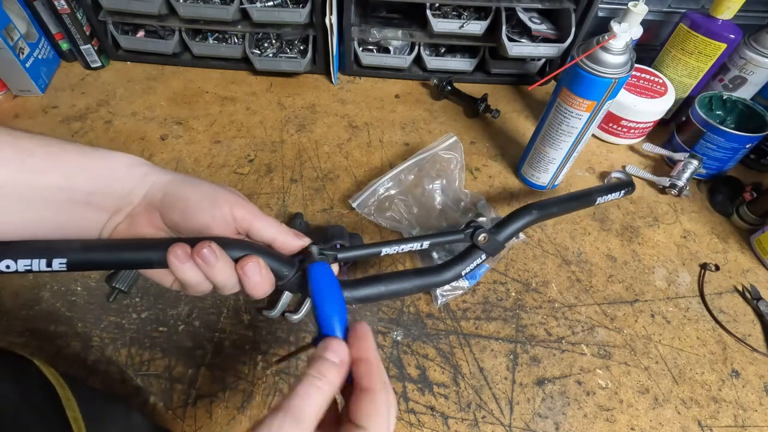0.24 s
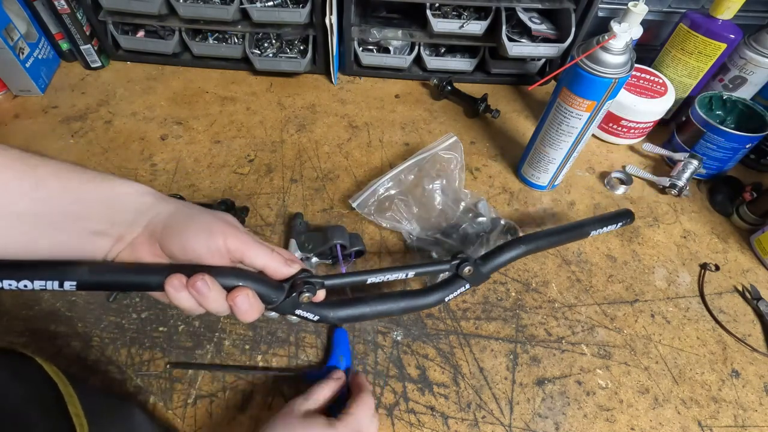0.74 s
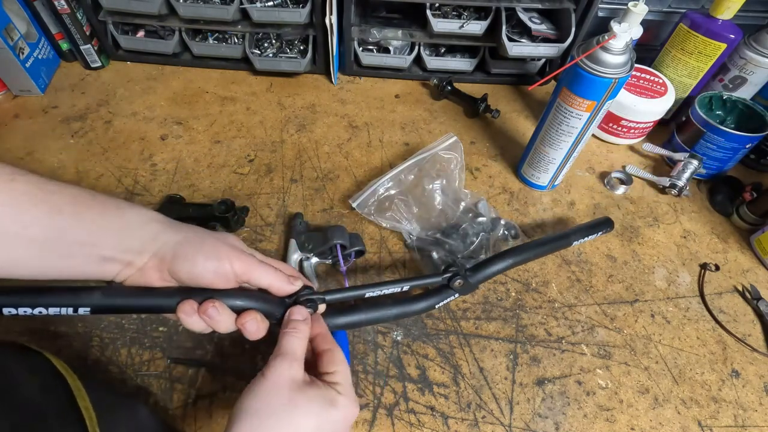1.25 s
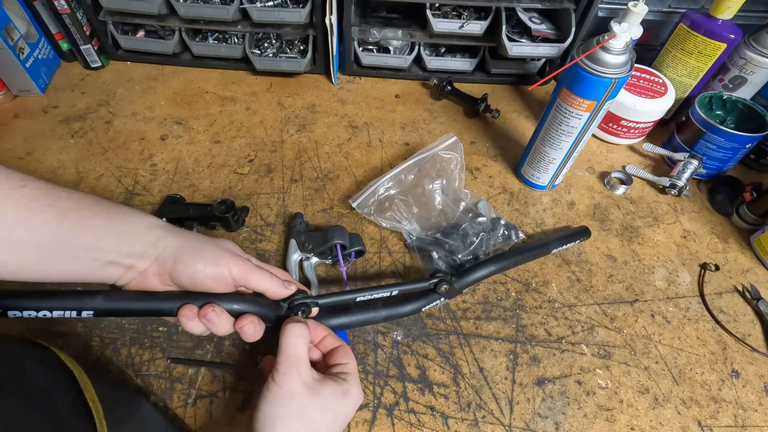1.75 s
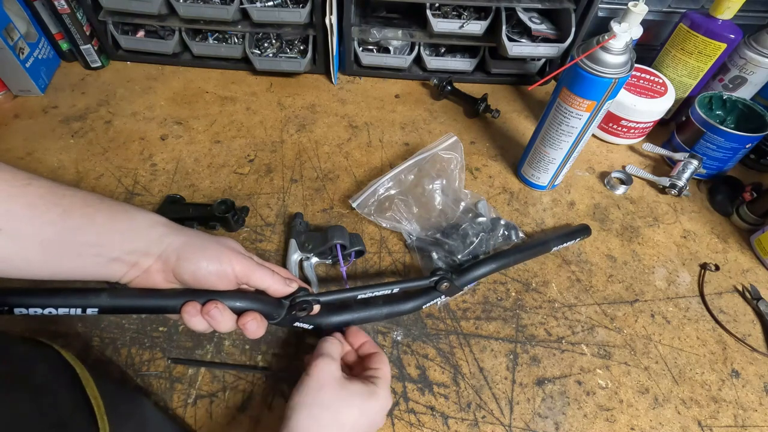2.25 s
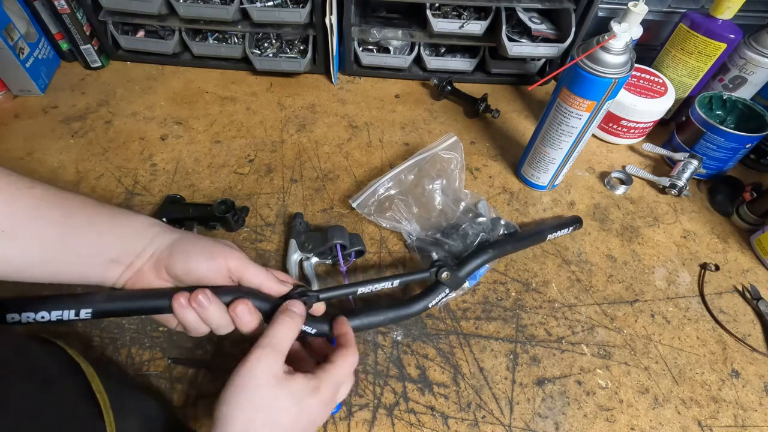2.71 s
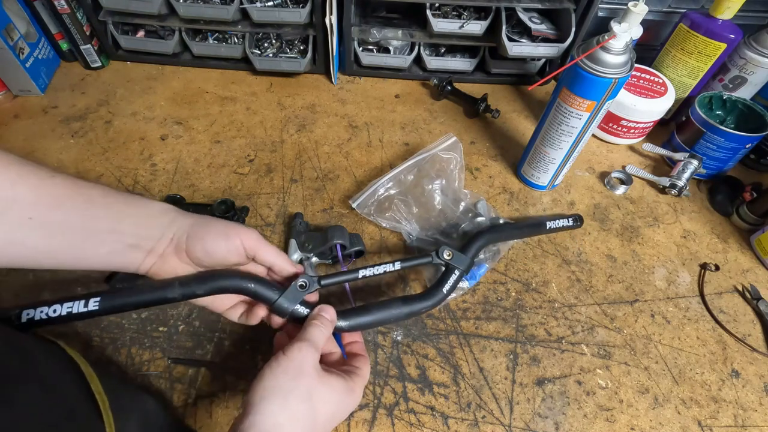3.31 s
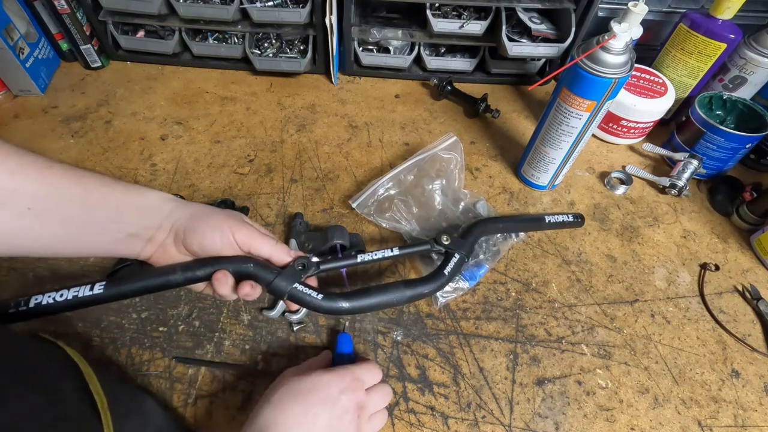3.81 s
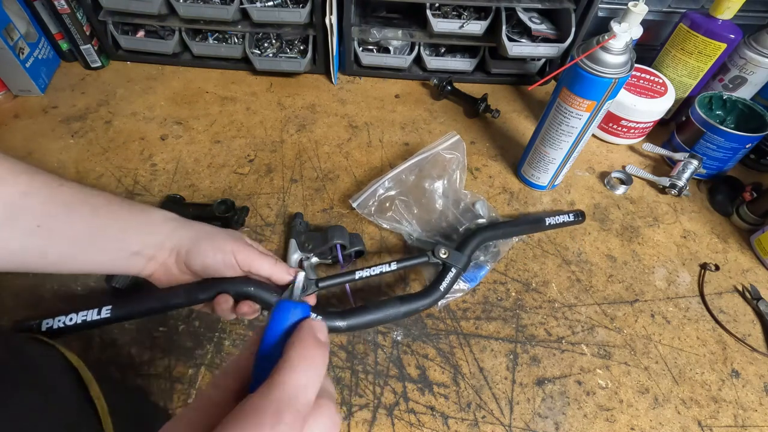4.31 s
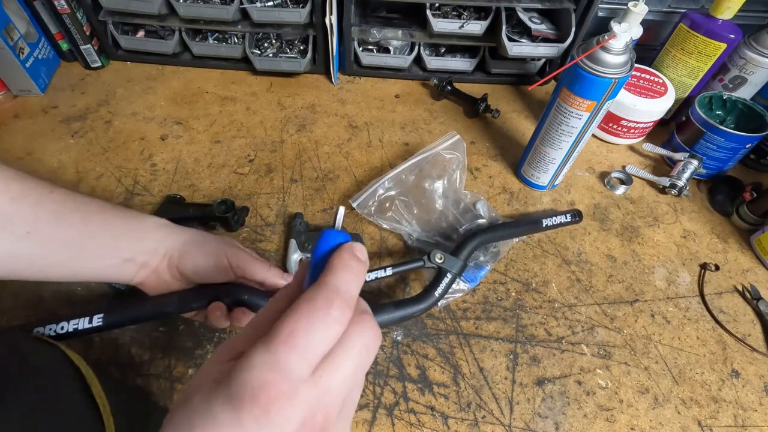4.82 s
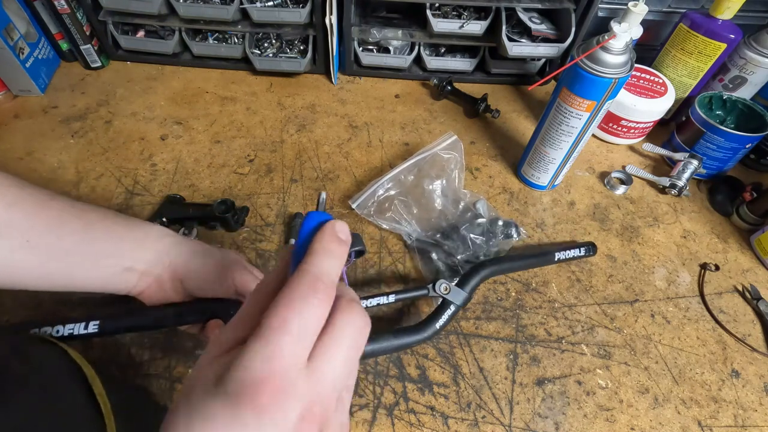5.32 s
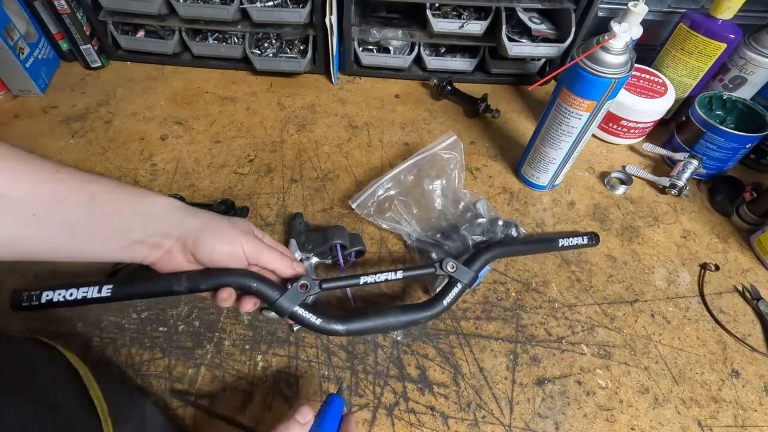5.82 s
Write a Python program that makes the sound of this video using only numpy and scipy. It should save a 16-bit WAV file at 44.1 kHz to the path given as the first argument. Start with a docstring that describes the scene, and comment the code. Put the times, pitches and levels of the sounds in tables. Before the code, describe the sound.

A hex key works on handlebar clamp hardware. First loud short clicks with a low thump, then tool-on-wood clatter, quiet fumbling, metal ticks and one bright crack. A quieter middle holds faint bolt ticks and skin and cloth sliding. Small bar taps build to a loud clank with a bench knock, then soft rustling. Recorded close, with low rumble and a short room echo.

```python
"""Hands work a hex key on the clamp of a metal handlebar above a wooden workbench in a workshop.
Metal ticks are noise cracks that ring the clamp or bar as damped sines; knocks excite the dense modes of the bench.
Random micro-slips scrape metal on metal, and fingers spin a loose bolt that ticks faintly.
Soft bumps and nudges wake single tones; skin, cloth and palm slide as shaped noise.
The bench carries a low rumble and hum to the microphone, and dying noise gives the room its echo."""
import sys
import numpy as np
from scipy import signal
from scipy.io import wavfile

SR = 44100
rng = np.random.default_rng(int(sys.argv[2]) if len(sys.argv) > 2 else 0)


def transcribe(u):
    """Save the signal u as a 16-bit wav file named by the first command-line argument.

    u: samples, shape (n,) or (channels, n), limited to [-1, 1]; the rate is SR.
    q: integer samples, one column per channel.
    """
    v = np.clip(np.atleast_2d(u).T, -1, 1)
    q = np.round(v * 32767).astype(np.int16)
    wavfile.write(sys.argv[1], SR, q)


N = 266893

# ringing modes of the clamp and its bolt: f/Hz, level/dB, free t60/s
CLAMP_MODES = [(1835, -1, .12), (2630, -14, .05), (3585, 3, .08), (4732, 5, .09), (5308, 1, .07),
               (5600, 3, .05), (6330, 6, .05), (7070, -3, .03)]
# ringing modes of the handlebar: f/Hz, level/dB, free t60/s
BAR_MODES = [(1072, -5, .16), (1109, -2, .19), (1674, -13, .25), (1895, -9, .2), (2207, -5, .2),
             (2745, -5, .17), (3311, -7, .16), (3989, -12, .2), (4156, -8, .2), (4525, -8, .2),
             (4678, -12, .16), (5216, -1, .16), (5297, -4, .15), (5636, -15, .2), (6300, -9, .1),
             (7000, -12, .08), (8931, -15, .2)]
# low modes of the bench: f/Hz, level/dB, t60/s when struck hard
BENCH_MODES = [(102.9, 4, 0.32), (162.7, -7.5, 0.35), (250, -4.5, 0.1), (288, -1, 0.067), (407.5, -7, 0.15),
               (620, -22.5, 0.035)]
BAR_FREE_S = 4.4   # from here on the key taps the bar, earlier the bolt
MIRROR = np.array([[1], [-1]])   # puts a side signal into left and right with opposite signs


def amp(db):
    """Turn dB into a linear gain."""
    return 10 ** (np.asarray(db) / 20)


def rms_one(x):
    """Scale a signal to an RMS of 1."""
    return x / np.sqrt(np.mean(x ** 2) + 1e-20)


def at_hz(points, hz):
    """Read a curve of (Hz, value) points along log frequency."""
    curve_hz, values = np.transpose(points)
    return np.interp(np.log(hz), np.log(curve_hz), values)


def butter(x, hz, kind, order=2):
    """Butterworth filter."""
    return signal.sosfilt(signal.butter(order, hz, kind, fs=SR, output="sos"), x)


def bands(white):
    """Half-octave slices of noise with their centres; neighbours come from unrelated draws."""
    edges = 120 * 2 ** np.arange(0, 7.6, .5)
    for k, (low, high) in enumerate(zip(edges, edges[1:])):
        yield np.sqrt(low * high), butter(white[k % 2], [low, high], "band")


def drift(rate_hz):
    """Slow random wander of spread 1: low-passed noise, computed at every 40th sample."""
    r = np.exp(-2 * np.pi * rate_hz * 40 / SR)
    white = rng.standard_normal(N // 40 + 2002)
    slow = signal.lfilter([1], [1, -2 * r, r * r], white)[2000:]   # skip the filter's settling
    return np.interp(np.arange(N) / 40, np.arange(len(slow)), rms_one(slow))


def ring(x, hz, t60):
    """Two-pole resonator: a unit click sets a dying sine of height 1 ringing."""
    r = amp(-60 / (max(t60, .004) * SR))
    w = 2 * np.pi * hz / SR
    return signal.lfilter([0, np.sin(w)], [1, -2 * r * np.cos(w), r * r], x + 1e-18)


def dying_noise(decay, colour, channels):
    """Impulse response of many dense modes: noise that dies at its own pace in each band; energy 1."""
    t = np.arange(SR) / SR
    out = 0
    for hz, band in bands(rng.standard_normal((2, channels, SR))):
        out = out + band * amp(at_hz(colour, hz) - 60 * t / at_hz(decay, hz))
    return rms_one(out) / np.sqrt(SR)


def struck(modes, s, db, favoured_hz, focus_db, waver_db=0):
    """Each contact strikes every mode by chance, most near its pitch (focus: dB per octave); modes can waver."""
    at, out = np.round(s * SR).astype(int), np.zeros(N)
    luck_db = rng.normal(0, 1.6, (len(at), len(modes)))
    for k, (hz, mode_db, t60) in enumerate(modes):
        octaves_off = np.abs(np.log2(hz / favoured_hz))
        clicks = np.zeros(N)
        clicks[at] = amp(db + mode_db + luck_db[:, k] - focus_db * octaves_off)
        out += ring(clicks, hz, t60) * amp(waver_db * drift(66))
    return out


def ticks():
    """A short crack of noise, coloured by modes the contact chokes, then the ring of clamp or bar."""
    # metal contacts: t/s, crack peak level/dB, brightness f/Hz, crack t60/s (limited below),
    # ring level relative to the crack level/dB (low where the grip damps it)
    contacts = [(0.0572, 8, 3350, 0.028, -63), (0.098, 1.5, 2700, 0.028, -45), (0.145, 3, 3800, 0.039, -29),
                (0.17, -4, 5670, 0.035, -43), (0.744, -13, 2700, 0.011, -44),
                (0.832, -13.5, 2220, 0.0092, -36), (0.9029, -10, 2600, 0.057, -27),
                (1.417, -37, 6700, 0.041, -27.5), (1.6544, -33.5, 3600, 0.053, -17),
                (1.72, -19.5, 6640, 0.025, -22), (1.7427, -25, 6140, 0.084, -29),
                (1.7705, -14, 5400, 0.031, -24), (1.976, -29.5, 3590, 0.027, -20.5),
                (2.1238, -9, 4540, 0.027, -22.5), (2.143, -16.5, 3980, 0.03, -23),
                (2.1926, 3.5, 6760, 0.021, -40), (2.428, -21, 5600, 0.037, -47),
                (3.676, -26.5, 3100, 0.017, -43), (3.782, -36, 1700, 0.021, -33),
                (4.5335, -18.5, 4440, 0.04, -41), (4.5586, -18, 3330, 0.16, -14),
                (4.732, -25.5, 3520, 0.011, -44.5), (4.763, -17.5, 3170, 0.059, -6),
                (4.9057, -27, 3300, 0.046, -8.5), (5.024, -29, 2590, 0.11, -6.5),
                (5.086, -26, 2760, 0.22, -3), (5.116, -14, 3200, 0.035, -38),
                (5.1965, 6, 6600, 0.088, -14.5), (5.206, -20, 5400, 0.03, 8), (5.373, -26, 2740, 0.038, -8),
                (5.398, -24, 4430, 0.044, -3), (5.425, -23, 4440, 0.014, -1.5),
                (5.459, -27.5, 6100, 0.048, 0), (5.8565, -39, 2130, 0.052, -3)]
    choked_db, choked_t60 = -39.5, 0.012
    out, t = np.zeros(N + 8192), np.arange(8192) / SR
    luck = rng.standard_normal((len(contacts), len(BAR_MODES)))
    whites = rng.standard_normal((len(contacts), 8192))
    for (s, db, hz, t60, _), white, row in zip(contacts, whites, luck):
        burst = butter(white * amp(-60 * t / np.clip(t60, .005, .2)), 1300, "high")
        modes = CLAMP_MODES[1:] if s < BAR_FREE_S else BAR_MODES[2:]
        choked = sum(amp(choked_db + 5.5 * chance) * ring(burst, f, choked_t60)
                     for (f, _, _), chance in zip(modes, row))
        crack = butter(burst + choked, [hz / 1.76, hz * 3.07], "band")
        out[round(s * SR):][:8192] += amp(db) * crack / np.abs(crack).max()

    s, db, hz, _, ring_db = np.transpose(contacts)
    early = s < BAR_FREE_S
    # a hard blow wakes all modes, a light tap mainly one; the small clamp always rings as a whole
    focus_db = np.where(early, 4.5, np.clip(-2.5 * (db + 2), 3, 50))
    for modes, mine in ((CLAMP_MODES, early), (BAR_MODES, ~early)):
        out[:N] += struck(modes, s[mine], (db + ring_db)[mine], hz[mine], focus_db[mine], waver_db=4)
    return out[:N]


def knocks():
    """Blows, each a cluster of contacts, excite two spots of a bench top that radiates unevenly to each side."""
    # dull blows on the bench: t/s, level/dB, bass push relative to it level/dB, hardness as top f/Hz
    blows = [(0.741, -13.5, 0, 2470), (0.766, -9.5, -38.5, 1910), (0.794, -14, -10.5, 2290),
             (0.831, -11.5, -6, 1830), (0.901, -9, -2.5, 1920), (0.934, -21, -1, 2130),
             (0.961, -18.5, -7, 1920), (1.654, -23, 5, 1740), (2.195, -25, 3.5, 1160),
             (2.24, -28.5, 5, 1270), (2.279, -16.5, -38, 3220), (2.364, -20.5, -36.5, 3060),
             (5.193, -9, 3.5, 1850), (5.946, -17.5, -3, 2040), (6.031, -22, 0, 1980)]
    # dense upper modes of the bench top: f/Hz, level/dB per Hz
    bench_colour = [(150, -8), (300, -6), (650, -14), (1050, -2), (1700, -4), (2600, -7), (4000, -18)]
    # and their decay: f/Hz, t60/s
    bench_decay = [(300, 0.27), (1500, 0.18), (5000, 0.041)]
    bounce_s, bounce_db = 0.007, -12.5   # each blow bounces once
    top_hz, top_db, top_t60 = 1063.8, -22.5, 0.1   # one mode of the bench top stands out
    spots, t = np.zeros((2, N + 2048)), np.arange(2048) / SR
    whites = rng.standard_normal((len(blows), 2048))
    for k, ((s, db, _, hard_hz), white) in enumerate(zip(blows, whites)):
        cluster = white * np.abs(white) * amp(-44.0 * (t / 0.012) ** 2)
        blow = butter(cluster, hard_hz, "low", order=4)
        blow = blow + amp(bounce_db) * np.roll(blow, round(bounce_s * SR))
        # blows land alternately on two spots of the bench
        spots[k % 2, round(s * SR):][:2048] += amp(db) * rms_one(blow) / 10
    mid, side = sum(signal.fftconvolve(spot[None], dying_noise(bench_decay, bench_colour, channels=2))[:, :N]
                    for spot in spots)
    direct = spots.sum(axis=0)[:N]
    board = mid + amp(top_db) * ring(direct, top_hz, top_t60) + amp(-9.5) * butter(side, 550, "high") * MIRROR
    s, db, push_db, _ = np.transpose(blows)
    push = butter(struck(BENCH_MODES, s, db + push_db, 510, focus_db=6.5), 270, "low")   # weight arrives softly
    return amp(8.0) * butter(direct, 890, "high") + amp(-0.5) * board + push


def scrapes():
    """Dense uneven micro-slips rattle the clamp, later the bar; the contact damps the ring."""
    # metal dragged over metal: full level from t/s, rise of 170 dB takes t/s, hold t/s, level/dB
    drags = [(1.894, 0.066, 0.04, -32), (1.927, 0.0027, 0.024, -28.5), (2.217, 0.0061, 0.1, -36.5),
             (4.557, 0.018, 0.026, -29), (4.825, 0.027, 0.022, -42), (5.05, 0.012, 0.021, -42.5),
             (5.108, 0.013, 0.047, -36.5), (5.17, 0.079, 0.079, -23.5), (5.383, 0.03, 0.077, -32.5)]
    fade_db_per_s, slips_per_s = 695, 1200
    t = np.arange(N) / SR
    level = 0
    for s, swell, hold, db in drags:
        rise_db = 170 * np.clip((s - t) / swell, 0, 5)
        fade_db = fade_db_per_s * np.maximum(t - s - hold, 0)
        level = level + amp(db - rise_db - fade_db)
    strength = amp(1.6 * rng.exponential(1, N).clip(0, 4))
    slips = (rng.random(N) < slips_per_s / SR) * strength * rng.choice([-1, 1], N)
    slips = level * rms_one(slips)
    early = np.arange(N) < BAR_FREE_S * SR
    # mode levels count half in dB
    clamp = sum(amp(.5 * db) * ring(slips * early, hz, .035) for hz, db, _ in CLAMP_MODES)
    bar = sum(amp(.5 * db) * ring(slips * ~early, hz, 0.047) for hz, db, _ in BAR_MODES[2:])
    return amp(-41.5) * clamp + amp(-32.5) * bar + amp(-7.0) * butter(slips, [2200, 7600], "band")


def spins():
    """Fingers spin the loose bolt, which ticks in its thread: faint bright cracks at random moments."""
    # turns of the bolt: start t/s, end t/s, level/dB
    turns = [(1.234, 1.52, -50), (2.5, 3.187, -43)]
    ticks_per_s, crack_t60 = 20, 0.032
    t = np.arange(N) / SR
    level = sum(amp(db) * (t > start) * (t < end) for start, end, db in turns)
    touches = (rng.random(N) < ticks_per_s / SR) * amp(1.5 * rng.standard_normal(N)) * level
    decay = signal.lfilter([1], [1, -amp(-60 / (crack_t60 * SR))], touches + 1e-18)
    return butter(decay * rng.standard_normal(N), [2600, 8500], "band")


def bumps():
    """Soft contacts reach only the low bench modes, and press in over several milliseconds."""
    # bar and knuckles on the bench: t/s, level/dB, favoured f/Hz
    contacts = [(0.097, 21.5, 652), (0.147, -9, 251), (2.777, -18.5, 163), (3.031, -23.5, 176),
                (3.19, -29.5, 415), (3.461, -29.5, 415), (3.815, -23, 284), (3.946, -18.5, 267),
                (5.853, -25, 163)]
    s, db, hz = np.transpose(contacts)
    damped = [(f, mode_db, 0.65 * t60) for f, mode_db, t60 in BENCH_MODES]
    tones = struck(damped, s, db, hz, focus_db=56.5)
    t = np.arange(N) / SR
    onset = 1 - sum(np.exp(-np.maximum(t - at, 0) / (3.5 / pitch)) * (t >= at) for at, pitch in zip(s, hz))
    return butter(tones * onset, 740, "low")


def nudges():
    """The held bar is nudged and answers with a faint tone, brief because the hand damps it."""
    # nudges of the bar: t/s, level/dB, favoured f/Hz
    touches = [(2.899, -44.5, 5297), (3.147, -41.5, 2207)]
    s, db, hz = np.transpose(touches)
    damped = [(f, mode_db, 0.56 * t60) for f, mode_db, t60 in BAR_MODES]
    return struck(damped, s, db, hz, focus_db=59, waver_db=4.5)


def slide():
    """Hands and sleeves slide: smooth friction hiss, a little patchy by band, mostly alike on both sides."""
    # strokes: full level from t/s, hold t/s, level/dB
    strokes = [(0, 0.15, -44.5), (0.585, 0.34, -41), (0.808, 0.23, -41.5), (1.615, 0.18, -50),
               (2.227, 0.19, -44.5), (2.573, 0.1, -41.5), (2.796, 0.35, -45.5), (3.458, 0.084, -44.5),
               (3.733, 0.11, -39), (4.035, 0.2, -34.5), (4.378, 0.29, -49), (5.3, 0.3, -45),
               (5.582, 0.18, -42.5), (5.851, 0.24, -38)]
    # colour of skin and cloth: f/Hz, level/dB per Hz
    skin = [(200, 10), (400, -5), (800, -9), (1200, -0.5), (2500, -6.5), (5400, -4), (7500, -7.5),
            (13000, -7.5), (15500, -36.5)]
    rise_db_per_s, fade_db_per_s, rest_db = 240.5, 132, -63.5
    tilt_per_db, flat_at_db = 0.163, -49.5   # a firmer stroke is brighter: dB per octave for each dB
    t = np.arange(N) / SR
    hiss_db = np.full(N, float(rest_db))
    for s, hold, db in strokes:
        rise_db = rise_db_per_s * np.maximum(s - t, 0)
        fade_db = fade_db_per_s * np.maximum(t - s - hold, 0)
        hiss_db = np.maximum(hiss_db, db - rise_db - fade_db)
    tilt_db = tilt_per_db * (hiss_db - flat_at_db)
    out, together = 0, drift(4.5)
    for hz, (mid, side) in bands(rng.standard_normal((2, 2, N))):
        patchy_db = 0.95 * together + 2.1 * drift(21)
        db = at_hz(skin, hz) + tilt_db * np.log2(hz / 5000) + patchy_db
        out = out + amp(db) * (mid + amp(-8.5) * side * MIRROR)
    return amp(hiss_db) * butter(out, 15000, "low", order=6)


def rubs():
    """Palm and bar rub dully on the bench: lumpy noise that swells and sinks."""
    # rubs: middle t/s, width (Gaussian sigma) t/s, level/dB
    swells = [(1.701, 0.032, -48.5), (2.24, 0.057, -44), (2.822, 0.038, -49.5), (3.196, 0.034, -54.5),
              (3.961, 0.055, -50), (4.6, 0.015, -47), (4.789, 0.024, -46), (5.299, 0.027, -63)]
    # dull band of the noise: low edge f/Hz, high edge f/Hz
    rub_band = [252, 1390]
    t = np.arange(N) / SR
    level = sum(amp(db) * np.exp(-.5 * ((t - s) / width) ** 2) for s, width, db in swells)
    lumpy = rng.standard_normal(N) * amp(7.3 * drift(7.1))
    return level * rms_one(butter(lumpy, rub_band, "band", order=1))


def lows():
    """Low noise rumbles nearly alike on both sides, and grip movements hum in the bench's low modes."""
    # carried through the bench: t/s, rumble level/dB, handling hum level/dB
    levels = [(0, -42, -79.5), (0.45, -50, -74), (1.3, -54, -72.5), (2.0, -45.5, -55), (2.3, -44, -81),
              (2.7, -57.5, -58.5), (3.35, -41, -50.5), (3.6, -50.5, -55.5), (3.97, -34.5, -48),
              (4.3, -49.5, -65), (5.1, -42.5, -52.5), (5.55, -44, -55), (6.05, -48, -55)]
    s, *columns = np.transpose(levels)
    rumble_db, grip_db = [np.interp(np.arange(N) / SR, s, column) for column in columns]
    mid, side = butter(butter(rng.standard_normal((2, N)), [14, 42], "band"), 45, "low")
    rumble = rms_one(mid + amp(-16.5) * side * MIRROR)
    white = rng.standard_normal(N) * amp(4 * drift(21))
    hum = sum(amp(db) * ring(white * amp(2.5 * drift(12.0)), hz, 1.2 * t60) for hz, db, t60 in BENCH_MODES)
    grip = rms_one(rms_one(hum) + amp(-6.5) * rms_one(butter(white, [90, 300], "band")))
    return amp(rumble_db) * rumble + amp(grip_db) * grip


def room(near):
    """Workshop echo: the near sounds pass through noise that dies at its own pace in each band."""
    # decay of the room: f/Hz, t60/s
    room_decay = [(200, 0.41), (1000, 0.71), (4000, 0.45), (12000, 0.39)]
    room_colour = [(700, 6.0), (5000, 0.5), (15000, -3.0)]   # f/Hz, level/dB per Hz
    mid, side = dying_noise(room_decay, room_colour, channels=2)
    echo = mid + 0.48 * butter(side, 880, "high") * MIRROR   # long waves reach both ports alike
    build_up = 1 - np.exp(-(np.arange(SR) / SR / 0.0031) ** 2)   # reflections take a while to build up
    return amp(-15) * signal.fftconvolve(near, echo * build_up, axes=1)[:, :N]


def close_reflection(near):
    """A close reflection, 2.4 ms late, reaches the two microphone ports unevenly."""
    late = np.roll(near, round(0.0024 * SR), axis=1)
    return amp(-11.0) * butter(late, 1500, "high") * MIRROR


def scene():
    """Sum the contacts with their reflections, the sliding hiss and the lows."""
    near = ticks() + knocks() + scrapes() + spins() + bumps() + nudges() + rubs()
    return near + close_reflection(near) + room(near) + slide() + lows()


def record(dry):
    """The housing shades the treble; gain control ducks loud blows; peaks are rounded; the top is cut."""
    shade = amp(-9.5)
    left, right = shade * dry + (1 - shade) * butter(dry, 8220, "low")
    ports = np.array([left, right - .8 * butter(right, 6000, "high")])   # the right port is duller

    t = np.arange(N) / SR
    over_db = np.maximum(20 * np.log10(np.abs(ports).max(axis=0) + 1e-9) + 16, 0)   # above -16 dB
    held_db = np.maximum.accumulate(over_db + 200 * t) - 200 * t   # lets go at 200 dB/s
    smooth_db = signal.lfilter([.03], [1, -.97], held_db)
    ducked = ports * amp(-.5 * smooth_db)

    ceiling = .62
    rounded = ceiling * np.tanh(ducked / ceiling)
    softened = butter(rounded, 13600, "low", order=10)
    return signal.sosfilt(signal.cheby2(12, 70, 16700, fs=SR, output="sos"), softened)


dry = scene()
out = record(dry)
transcribe(out)
```